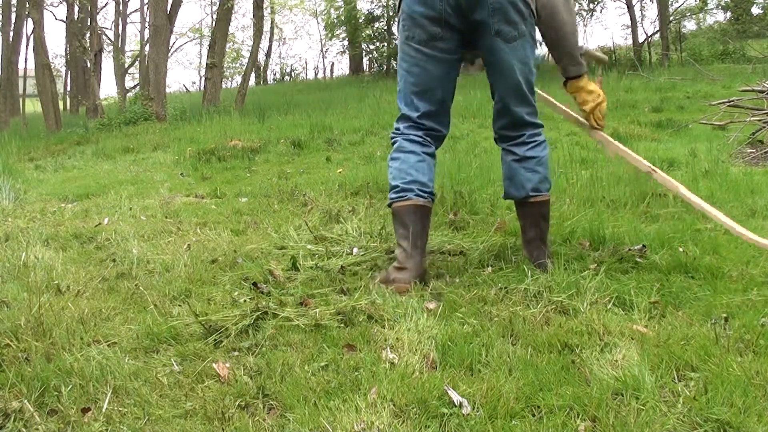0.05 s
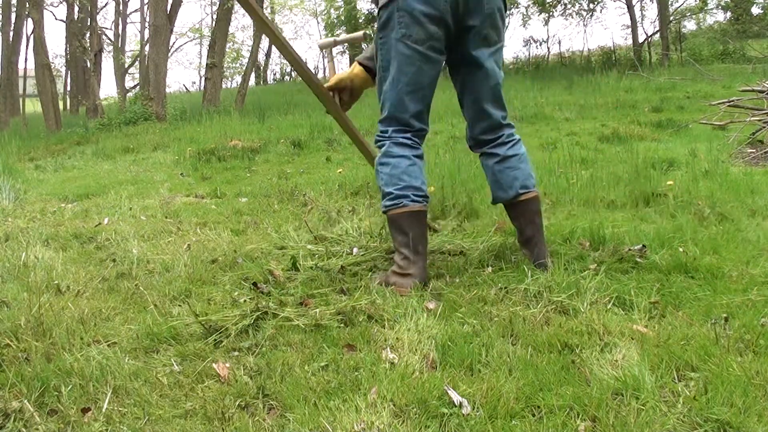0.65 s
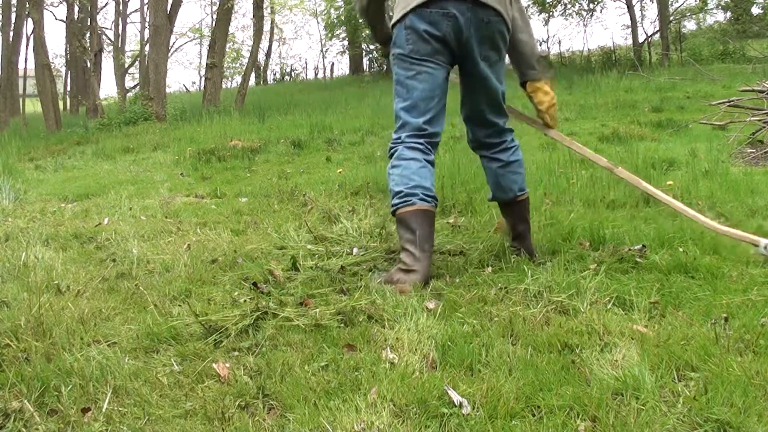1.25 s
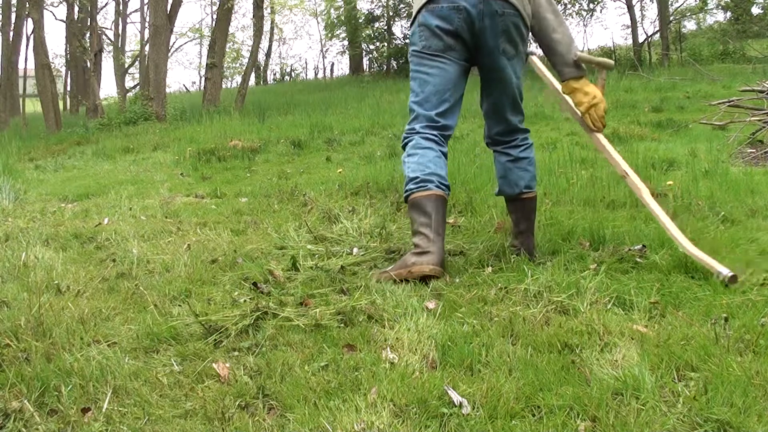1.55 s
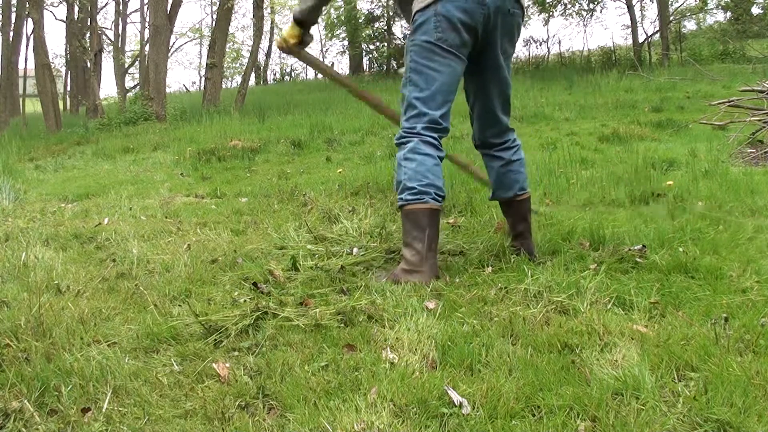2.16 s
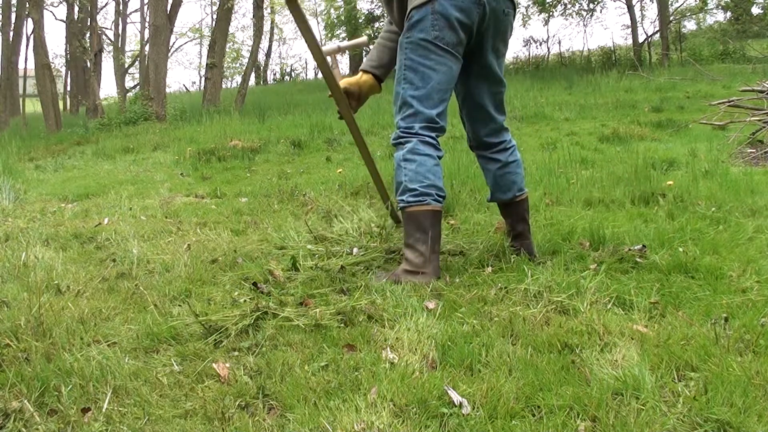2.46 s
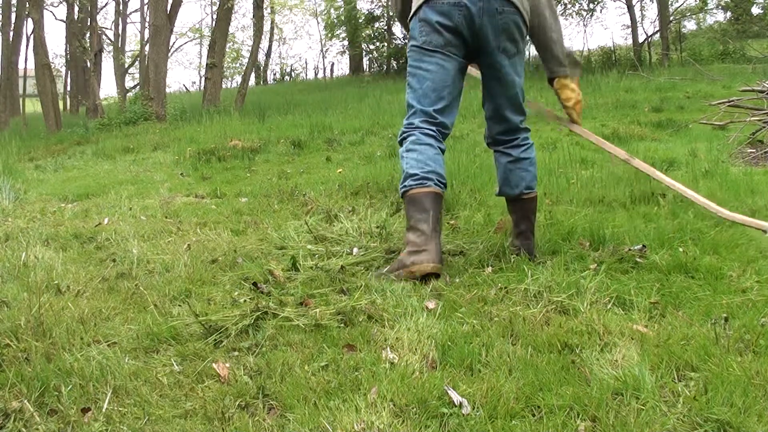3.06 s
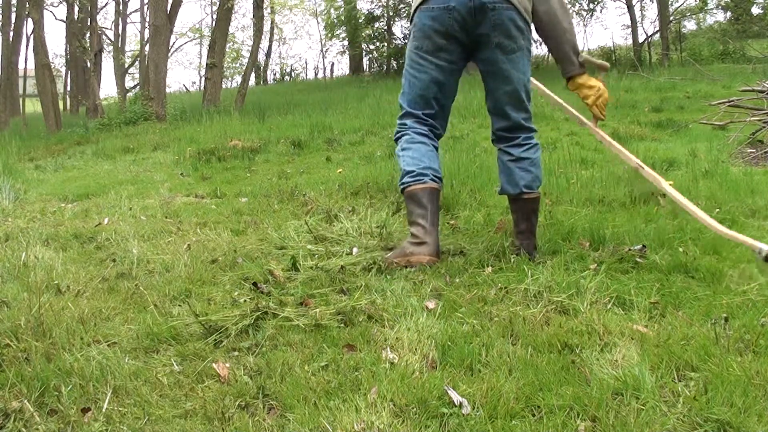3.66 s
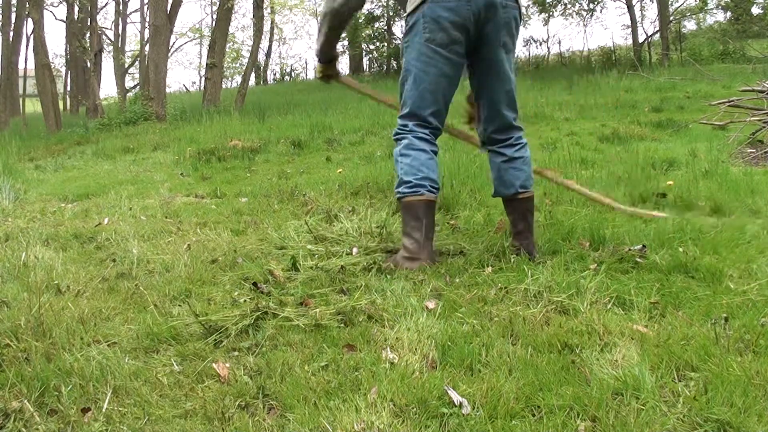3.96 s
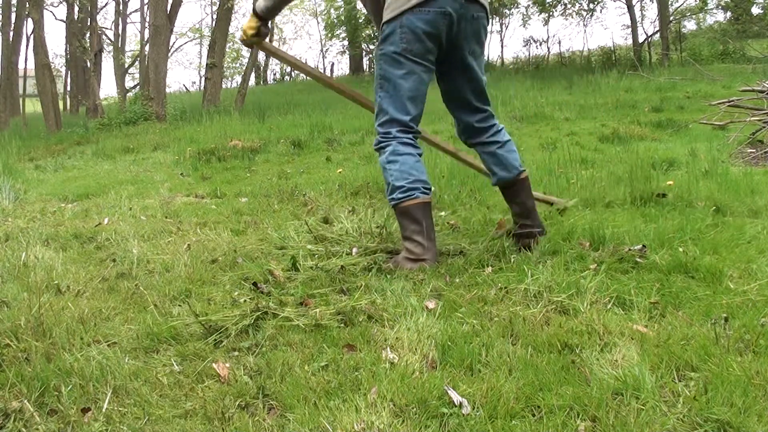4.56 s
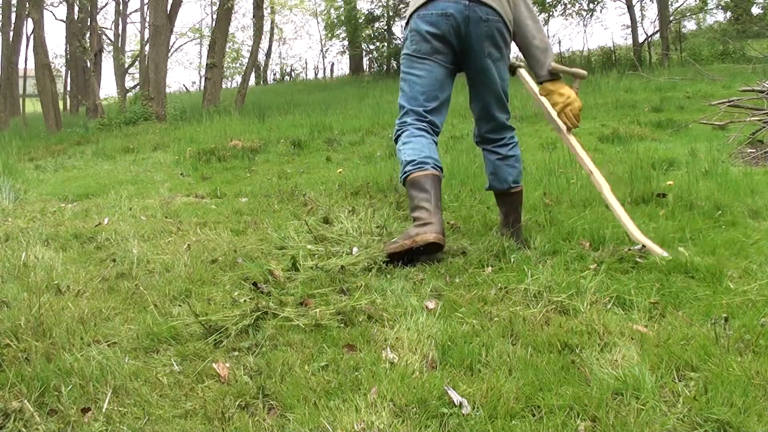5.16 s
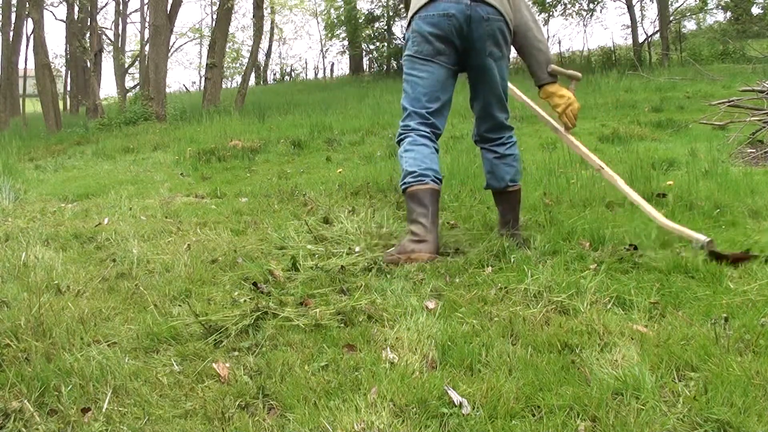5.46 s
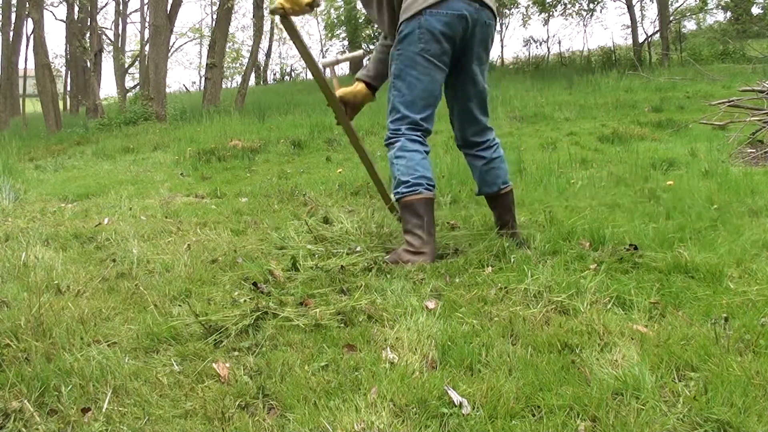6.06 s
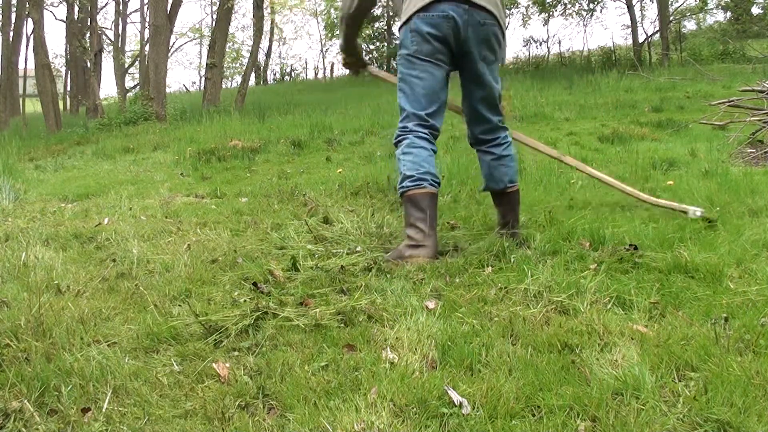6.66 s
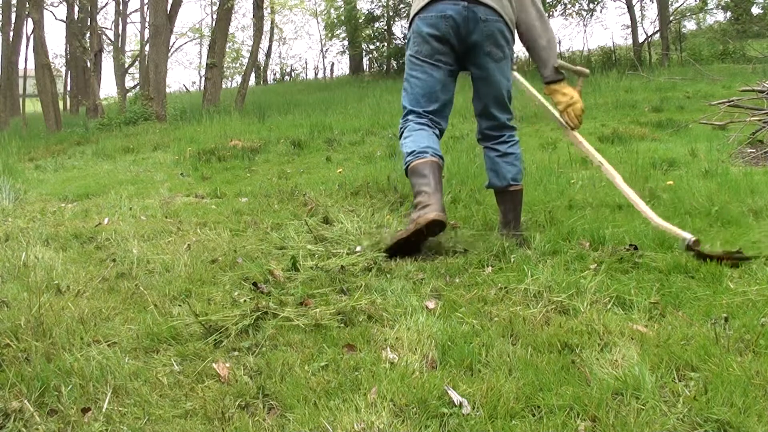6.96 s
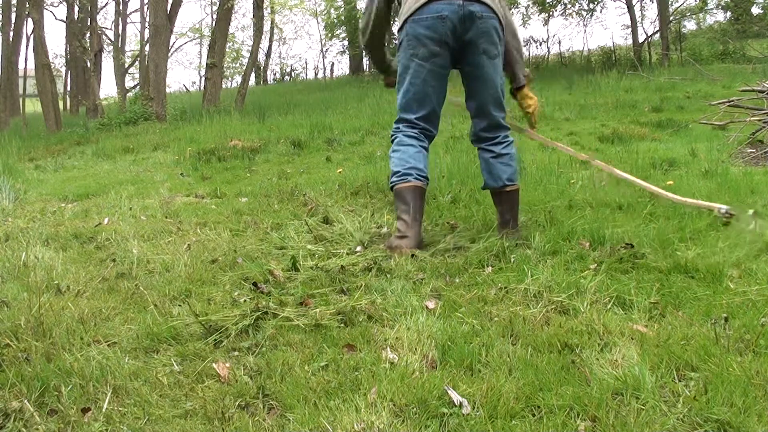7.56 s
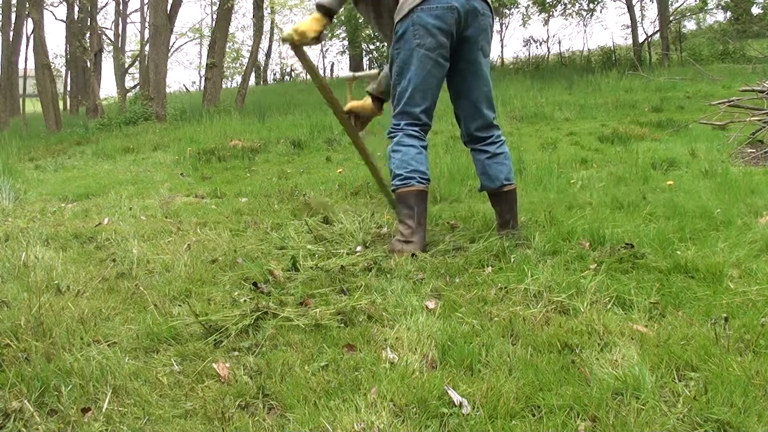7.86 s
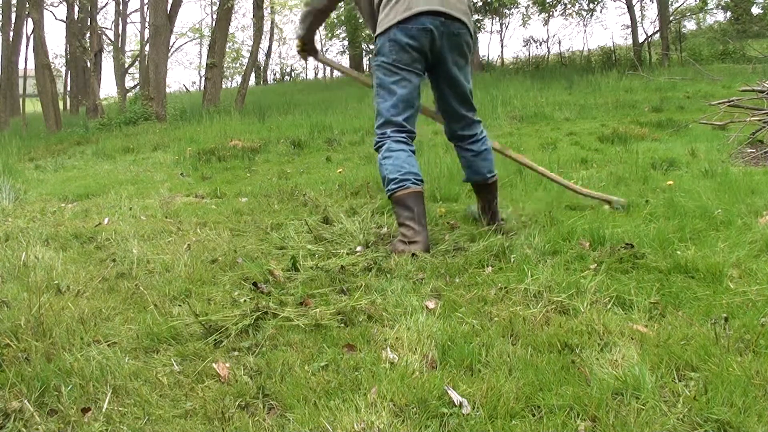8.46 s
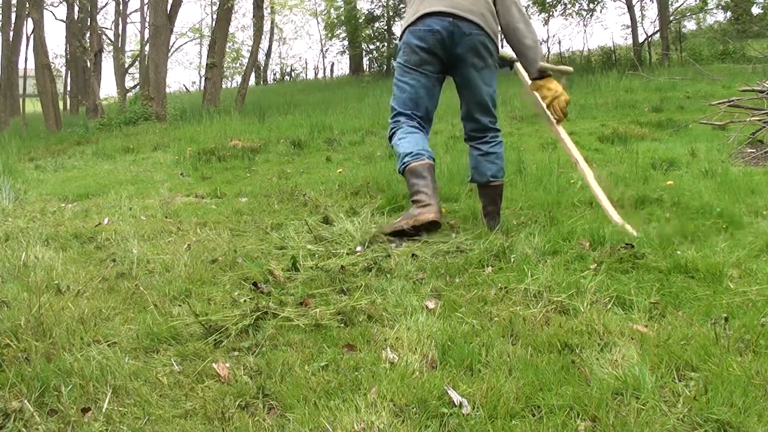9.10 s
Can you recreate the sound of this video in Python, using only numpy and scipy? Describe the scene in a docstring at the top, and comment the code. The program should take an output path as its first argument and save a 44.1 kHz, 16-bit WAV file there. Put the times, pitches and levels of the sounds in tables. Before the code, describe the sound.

Close to the microphone, a scythe mows grass in five strokes about two seconds apart. Each starts as a crisp, tearing hiss and sinks into a hollow whoosh, with thick stalks snapping. Between strokes the blade brushes back over stubble, boots scuff, and two dull wooden knocks sound. Farther off to the left, birds whistle and warble, then one trills, softly echoed by trees over a distant rumble.

```python
"""A grassy slope at the edge of a wood, the microphone close to a scythe mowing five strokes.
The blade swings in from the right, snips and tears through the stalks, heaves them into the swath
and slides back over the stubble; thick stalks snap, handle and boots knock. Farther off to the left,
birds trill, whistle and buzz, and the trees echo them. A distant rumble and faint hiss lie under it all."""
import sys
import numpy as np
from scipy import signal
from scipy.fft import rfft, irfft, next_fast_len
from scipy.io import wavfile
from scipy.ndimage import uniform_filter1d, map_coordinates

SR = 44100
rng = np.random.default_rng(int(sys.argv[2]) if len(sys.argv) > 2 else 0)


def dump(signal):
    """Clip the signal to [-1, 1] and save it as 16-bit WAV at the path in sys.argv[1]."""
    limited = np.clip(np.atleast_2d(signal).T, -1, 1)
    pcm = np.round(limited * 32767).astype(np.int16)
    wavfile.write(sys.argv[1], SR, pcm)


N = 411453

# Spectra of the cut, close up: (frequency [Hz], level [dB])
SNIP_SPECTRUM = [(1500, -13), (4000, -23), (5300, -4), (6200, 2), (7200, 0), (8200, -2.5), (10500, -6),
                 (12500, -9), (14000, -19), (16000, -20)]
TEAR_SPECTRUM = [(300, -37), (900, -7.5), (1450, -8), (1800, -3), (2300, -2.5), (3100, -0.5), (3700, 1.5),
                 (4800, 1), (6500, -3), (12000, -93)]
SWATH_SPECTRUM = [(80, -34), (200, -6.5), (380, -3.5), (580, -1), (780, -0.5), (1000, -1.5), (1180, -5.5),
                  (1320, -3), (1650, -3.5), (2200, -14.5), (2800, -5.5), (4500, -48)]
def mowing():
    """Close by, the edge snips and tears through the stand, then heaves the cut grass aside."""
    snip, tear, heave = stroke_gains()
    edge = stalks(SNIP_SPECTRUM, per_s=4000, scatter_db=.5, rub=.54, clump_db=.24,
                  patchy_db=1.57, side_db=-91)
    stems = stalks(TEAR_SPECTRUM, per_s=1500, scatter_db=.5, rub=1, clump_db=1.07,
                   patchy_db=2, side_db=-45)
    heap = stalks(SWATH_SPECTRUM, per_s=1200, scatter_db=1, rub=.96, clump_db=3.16,
                  patchy_db=1, side_db=-19)
    cut = amp(-1.05) * snip * edge + amp(-1.5) * (tear * stems + heave * heap)
    return swing(cut * amp(.9 * wobble(60)), width_octaves=.32)


# Strokes: (grass lands [s], blade enters [s before], bites [s before], leaves [s before],
# entry level [dB], bite level [dB], tearing relative to bite [dB], landing level [dB])
STROKES = [ (.499, .49, 0.23, .028, -35.5, -25, 0, -24.5),
           (2.292, .35, 0.095, 0.081, -29.5, -22.5, -1, -26),
           (4.196, 0.52, 0.24, .09, -30, -19.5, -3, -23.5),
           (6.007, 0.46, 0.18, 0.093, -29, -18.5, -2.5, -22.5),
           (7.895, 0.52, 0.18, 0.051, -30.5, -20.5, -1.5, -21.5)]
# Thick tufts met by the edge: (time [s], snipping [dB], tearing [dB])
TUFTS = [(.03, -32.5, -42.5), (.265, -26, -30), (.38, -28, -33), (1.965, -34.5, -32), (2.27, -20, -31),
         (3.81, -27, -25), (3.865, -24, -23.5), (4.065, -25, -22.5), (5.545, -27.5, -50), (5.825, -22, -21),
         (5.9, -29, -26), (7.69, -24, -21.5), (7.98, -25.5, -32), (9.25, -37.5, -42), (9.305, -33.5, -41)]
def stroke_gains():
    """Snip, tear and heave gains: the tip works in, the edge bites, grass piles up, lands and scatters."""
    times, snip_db, tear_db = np.transpose(TUFTS)
    snip = bumps(times, snip_db, width_s=.018)
    tear = bumps(times, tear_db, width_s=.018)
    heave = np.zeros(N)
    land_s, spray_s = .039, .045
    for s, enters, bites, leaves, entry_db, bite_db, torn_db, land_db in STROKES:
        entry = power(entry_db) * swell(s - enters, s - leaves, rise=97.5, fall=450, growth=-2)
        snipping_bite = power(bite_db) * swell(s - bites, s - leaves, rise=141, fall=450, growth=22)
        tearing_bite = power(bite_db + torn_db) * swell(s - bites, s - leaves, rise=141, fall=450)
        spray = power(-22) * swell(s - spray_s, s, rise=166, fall=137)
        gather = power(-8.5) * swell(s, s, rise=34.5, fall=137)
        landing = swell(s - land_s / 2, s + land_s / 2, rise=166, fall=236)
        snip += entry + snipping_bite + spray
        tear += power(-1.5) * entry + tearing_bite + power(-4.5) * spray
        heave += power(land_db) * (gather + landing)
    return np.sqrt([snip, tear, heave])


# The arc past the microphone: (time from landing [s], swish centre [Hz], lift [dB], left minus right [dB])
SWING_ARC = [(-.625, 6800, 0, -2.6), (-.325, 6200, 2.5, -2.8), (-.225, 4000, 5.5, -2.6),
             (-.175, 3500, 4, -2.2), (-.095, 2600, 4.5, -.6), (-.04, 1450, 4, 0), (.005, 720, 3.5, 0),
             (.075, 560, 2, 0), (.275, 500, 0, -.3)]
# Scaling of that left-right difference: (frequency [Hz], factor)
PAN_FACTORS = [(500, 1.1), (2000, 0.49), (4500, 1.3), (8000, 1.1), (12000, 0.033)]
def swing(x, width_octaves):
    """As the blade arcs in from the right, its swish sinks from a hiss to a hollow whoosh."""
    hz, t, spectra = signal.stft(x, SR, nperseg=512, noverlap=384)
    since = t[:, None] - np.array(STROKES)[:, 0]
    from_landing = since[np.arange(len(t)), np.abs(since).argmin(axis=1)]
    times, *columns = np.transpose(SWING_ARC)
    centre_hz, lift_db, pan_db = [np.interp(from_landing, times, column) for column in columns]
    band = np.exp(-.5 * (np.log2((hz[:, None] + 1) / centre_hz) / width_octaves) ** 2)
    lean_db = along(PAN_FACTORS, hz)[:, None] * pan_db
    spectra = spectra * amp(lift_db * (band - .3237)) * amp([lean_db / 2, -lean_db / 2])
    return signal.istft(spectra, SR, nperseg=512, noverlap=384)[1][:, :N]


# Thick stalks on the edge: (time [s], level [dB], pitch [Hz], 60 dB decay [s])
SNAPS = [(0.4524, -4, 6500, .004), (.506, -10, 7000, .005), (1.3118, -28, 3970, 0.023),
         (2.263, -1, 8000, 0.0072), (4.1052, -9, 6000, 0.0029), (5.8573, -5.5, 6000, 0.025),
         (5.9174, 2, 7560, .0078), (6.0584, -10, 6540, .008), (7.3792, -9.5, 6200, 0.016),
         (7.478, -5.5, 5660, 0.012), (7.8618, -4, 7000, .003), (7.954, 0.5, 8650, .002),
         (8.4413, -14, 4650, 0.018)]
# Moist stalks dull the very top of a snap: (frequency [Hz], gain [dB])
SNAP_COLOUR = [(300, 6), (1000, 3.5), (9000, -1.5), (12000, 3), (14000, -11), (16000, -14)]
def snaps():
    """A thick stalk breaks with a crack: the shorter it is, the broader its band."""
    track, t = np.zeros(N), np.arange(SR // 25) / SR
    for s, db, hz, t60 in SNAPS:
        burst = rng.standard_normal(len(t)) * amp(-60 * t / t60) * (1 - np.exp(-t / .0001))
        resonance = signal.iirpeak(hz, Q=1 + t60 / .008, fs=SR)
        crack = signal.lfilter(*resonance, burst)
        add(track, s, amp(db) * crack / np.abs(crack).max())
    return filtered(track, lambda hz: amp(along(SNAP_COLOUR, hz)))


# The blade sliding back: (start [s], length [s], mid-swing level [dB])
BACKSWINGS = [(0.824, 0.71, -40.5), (2.53, 0.92, -37.5), (4.517, 1, -39), (6.306, 0.87, -38),
              (8.214, 0.79, -36.5)]
# Boots and blade scuffing the ground: (time [s], level [dB])
SCUFFS = [(1.375, -42.5), (3.15, -38), (4.56, -36), (4.81, -38.5), (5.02, -43), (6.63, -37.5),
          (6.95, -42.5), (7.13, -40), (8.55, -39), (8.73, -36)]
# Brushed stubble: (frequency [Hz], level [dB])
STUBBLE_SPECTRUM = [(200, -3), (500, -9.5), (1000, -10), (2000, -5), (3500, -3), (4800, -3.5), (6200, 1.5),
                    (7300, 0), (8500, -3.5), (11000, -6.5), (14000, -16.5), (16000, -34)]
def backswing():
    """The blade's back eases onto the stubble, presses most at mid-swing and lifts; boots scuff along."""
    t = np.arange(N) / SR
    contact = bumps(*np.transpose(SCUFFS), width_s=.03)
    for s, length, db in BACKSWINGS:
        easing_db = 5.5 * np.minimum((2 * (t - s) / length - 1) ** 2, 1)
        contact += power(db - easing_db) * swell(s, s + length, rise=45, fall=45)
    gain = np.sqrt(contact) * amp(1.03 + 1.1 * wobble(22))
    return gain * stalks(STUBBLE_SPECTRUM, per_s=1500, scatter_db=0, rub=1, clump_db=.7,
                         patchy_db=1.5, side_db=-86)


# Dull knocks of handle and boots: (time [s], level [dB], change per contact [dB])
KNOCKS = [(4.56, -22.5, 1.5), (5.364, -23.5, -1)]
# The wooden handle: (frequency [Hz], bandwidth [Hz], level [dB])
HANDLE_MODES = [(830, 130, 5), (1070, 75, 6), (1300, 120, 6), (1990, 62, 2), (2330, 100, 4)]
def knocks(gap_s=.0105, contact_t60=.036):
    """Each knock is a quick rattle of three contacts that ring a few damped wooden modes."""
    track, t = np.zeros(N), np.arange(SR // 15) / SR
    ring = sum(amp(db) * np.exp(-np.pi * width * t) * np.sin(2 * np.pi * hz * t)
               for hz, width, db in HANDLE_MODES)
    for s, db, step_db in KNOCKS:
        for k in range(3):
            contact = rng.standard_normal(len(t)) * amp(-60 * t / contact_t60)
            knock = signal.fftconvolve(ring, contact)
            add(track, s + k * gap_s, amp(db + k * step_db) * knock / np.abs(knock).max())
    return track


# One slur of the trilling bird: (time from its accent [s], pitch [Hz], level [dB])
SLUR = [(-.024, 5116, -19), (-.014, 4114, -9.5), (-.003, 3625, -13), (.003, 3404, 1), (.01, 2994, -4),
        (.023, 2725, -7), (.029, 2130, -6.5), (.033, 1806, -21.5), (.056, 1310, -20)]
def trill(start_s=6.037, slurs=18, loudest_slur=7.2, shortest_gap_s=.149, first_pause_s=.025):
    """A falling slur repeats, fastest and loudest near mid-song; its path through trees makes it flicker."""
    track = np.zeros(N)
    times, hz, levels = np.transpose(SLUR)
    t = np.arange(times[0], times[-1], 1 / SR)
    for k in range(slurs):
        db = -21 - .06 * (k - loudest_slur) ** 2 + np.interp(t, times, levels)
        pitch = np.interp(t, times, hz) * (1 + .00896 * rng.standard_normal())
        add(track, start_s + times[0], amp(db) * np.sin(2 * np.pi * np.cumsum(pitch) / SR))
        slowing_s = .000124 * (k - (slurs - 1) / 2) ** 2
        start_s += shortest_gap_s + slowing_s + first_pause_s * (k == 0)
    return track * amp(1.8 * wobble(250))


# A warbled phrase: (offset [s], length [s], start [Hz], middle [Hz], end [Hz], level [dB])
PHRASE_NOTES = [(-.175, .06, 1550, 1660, 1600, -13), (-.112, .062, 1700, 2100, 2320, -5.5),
                (-.035, .035, 2400, 2650, 3000, -15), (-.005, .07, 3030, 3115, 3070, -1),
                (.12, .03, 3350, 3550, 3650, -14), (.155, .04, 2650, 2370, 2320, -9)]
# Each time it is sung: (time [s], level [dB], pitch ratio)
PHRASE_REPEATS = [(2.41, -35.5, 1.025), (2.81, -29.5, .998), (3.205, -27, .992), (3.6, -29.5, 1.0)]
# Loose notes: (time [s], length [s], start [Hz], middle [Hz], end [Hz], level [dB])
WHISTLES = [(2.835, .05, 1180, 1330, 1540, -42), (4.6, .045, 1800, 1720, 1680, -42),
            (4.635, .055, 2600, 2350, 1830, -38), (4.79, .18, 1750, 1600, 1510, -42.5),
            (5.212, .045, 2440, 2260, 1970, -31.5), (5.27, .05, 1830, 1740, 1700, -37),
            (5.458, .04, 1830, 1740, 1690, -35), (9.28, .06, 2650, 2400, 1900, -33)]
def songs():
    """Among the trees one bird sings a rolling phrase four times and another whistles; both flicker."""
    track = np.zeros(N)
    for s, db, ratio in PHRASE_REPEATS:
        for offset, length, *pitches, note_db in PHRASE_NOTES:
            add(track, s + offset, amp(db + note_db) * whistle(length, ratio * np.array(pitches)))
    for s, length, *pitches, db in WHISTLES:
        add(track, s, amp(db) * whistle(length, pitches))
    return track * amp(4.2 * wobble(90))


# Calls from deep in the wood: (time [s], length [s], start [Hz], middle [Hz], end [Hz], level [dB])
FAR_CALLS = [(0.082, 0.22, 2336, 2515, 2570, -42), (0.793, 0.17, 2360, 2520, 2670, -43.5),
             (1.705, 0.18, 2280, 2500, 2560, -42), (2.809, 0.154, 1080, 1110, 1114, -43)]
# Their partials: (pitch ratio, level [dB])
CALL_PARTIALS = [(1, 1.5), (1.16, -2.5), (1.29, -5.5)]
def far_calls():
    """Distant, raspy rising notes: a few close partials, each with its own fast flutter."""
    track = np.zeros(N)
    for ratio, partial_db in CALL_PARTIALS:
        partial = np.zeros(N)
        for s, length, *pitches, db in FAR_CALLS:
            add(partial, s, amp(db + partial_db) * whistle(length, ratio * np.array(pitches)))
        track += partial * (.69 + .81 * wobble(300))
    return track


# What the trees return of the trill: (frequency [Hz], gain [dB])
TRILL_ECHO_COLOUR = [(1500, -5), (2450, 0), (2780, -1), (2920, 4.5), (3100, -6.5), (4000, 4), (5000, -11)]
# Reverberation of the wood: (frequency [Hz], 60 dB decay [s])
WOOD_DECAY = [(300, .5), (1500, .75), (3000, .9), (6000, .4), (12000, .2)]
def wood_echo(slurs, notes, calls):
    """The trees scatter the birdsong into a soft, diffuse stereo tail."""
    far_slurs = filtered(slurs, lambda hz: amp(along(TRILL_ECHO_COLOUR, hz)))
    birdsong = amp(-11) * far_slurs + amp(-8.5) * notes + amp(-6) * calls
    echo, hop = np.zeros((2, N)), SR // 4
    for start in range(0, N - 2 * hop, hop):
        hz, t, noise = signal.stft(rng.standard_normal((2, SR)), SR, nperseg=256)
        envelope = amp(-60 * t / along(WOOD_DECAY, hz)[:, None]) * (1 - np.exp(-t / .01))
        mid, side = signal.istft(noise * envelope, SR, nperseg=256)[1]
        tails = spread(mid, side, side_db=-13) / np.linalg.norm(mid)
        piece = birdsong[start:start + 2 * hop] * np.sqrt(np.hanning(2 * hop))
        for channel, tail in zip(echo, tails):
            add(channel, start / SR, signal.fftconvolve(piece, tail))
    return echo


# Ambience of the slope: (frequency [Hz], level [dB])
RUMBLE_SPECTRUM = [(20, -38), (30, -35), (40, -24), (58, -6), (85, -2), (125, 1), (170, -3.5), (240, -8),
                   (340, -11), (480, -21.5), (900, -22), (2000, -28.5)]
AIR_SPECTRUM = [(30, -6), (200, 7.5), (900, 4), (2000, 3), (3000, 3), (4500, -22.5), (6500, -19),
                (9000, -50), (13000, -72), (16000, -5.5)]
# The rumble's rise and fall: (time [s], level [dB])
RUMBLE_LEVELS = [(0.0, -35.5), (0.07, -42.5), (0.36, -41), (0.72, -47), (3.9, -36.5), (4.65, -42.5),
                 (5.53, -38), (9.33, -39.5)]
def outdoors():
    """A distant rumble and a faint, even hiss of air and leaves, widest in the midrange."""
    mid, side = coloured(rng.standard_normal((2, N)), RUMBLE_SPECTRUM)
    rumble = spread(mid, side, side_db=-29.5) * amp([[-.3], [.3]])
    rumble_db = np.interp(np.arange(N) / SR, *np.transpose(RUMBLE_LEVELS))
    mid, side = coloured(rng.standard_normal((2, N)), AIR_SPECTRUM)
    side = filtered(side, lambda hz: hz / (hz + 150) / (1 + (hz / 4500) ** 2))
    air = spread(mid, side, side_db=3)
    return amp(rumble_db + .6 + .82 * wobble(6.3)) * rumble + amp(-51) * air


def stalks(spectrum, per_s, scatter_db, rub, clump_db, patchy_db, side_db):
    """Many stalks crack at random, in tufts, over the smooth rub of leaves."""
    sizes = amp(scatter_db * np.minimum(rng.standard_normal((2, N)), 2))
    cracks = (rng.random((2, N)) < per_s / SR) * rng.choice([-1, 1], (2, N)) * sizes
    tufts = amp(clump_db * (wobble(45) + wobble(260)))
    rustle = (unit(cracks) + rub * rng.standard_normal((2, N))) * tufts
    mid, side = coloured(patchy(rustle, patchy_db), spectrum)
    return spread(mid, side, side_db)


def patchy(x, depth_db):
    """Every tuft has its own colour: random gains about 600 Hz wide and 50 ms long."""
    spectra = signal.stft(x, nperseg=512)[2]
    patches = uniform_filter1d(rng.standard_normal(spectra.shape[1:]), size=7, axis=0)
    patches = uniform_filter1d(patches, size=9, axis=1)
    return signal.istft(spectra * amp(depth_db * unit(patches)), nperseg=512)[1][:, :N]


def whistle(length_s, pitches_hz):
    """A pure note bending through three pitches, with soft ends."""
    progress = np.linspace(0, 1, int(length_s * SR))
    hz = np.polyval(np.polyfit([0, .5, 1], pitches_hz, 2), progress)
    return np.sin(2 * np.pi * np.cumsum(hz) / SR) * np.abs(np.sin(np.pi * progress)) ** .18


def swell(start, end, rise, fall, growth=0):
    """Power over time: a rise to start, a sloping hold (1 at its middle), a fall after end; all in dB/s."""
    t = np.arange(N) / SR
    held = np.clip(t, start, end)
    hold_db = growth * (held - (start + end) / 2)
    db = hold_db - rise * np.maximum(held - t, 0) - fall * np.maximum(t - held, 0)
    return power(np.maximum(db, -120))


def bumps(times, levels_db, width_s):
    """Power over time of brief, bell-shaped swells."""
    total, t = np.zeros(N), np.arange(N) / SR
    for s, db in zip(times, levels_db):
        near = np.abs(t - s) < 10 * width_s
        total[near] += power(db) * np.exp(-.5 * ((t[near] - s) / width_s) ** 2)
    return total


def amp(db):
    """Decibels to gain."""
    return 10 ** (np.asarray(db) / 20)


def power(db):
    """Decibels to power."""
    return amp(db) ** 2


def unit(x):
    """Scale to rms 1."""
    return x / np.sqrt(np.mean(x ** 2) + 1e-20)


def along(points, hz):
    """(Hz, value) points read on a log axis."""
    frequencies, values = np.transpose(points)
    return np.interp(np.log(hz + 1), np.log(frequencies + 1), values)


def wobble(rate):
    """A smooth random curve, rate knots a second."""
    knots = rng.standard_normal(int(N * rate / SR) + 4)
    return map_coordinates(knots, [np.arange(N) * rate / SR])


def filtered(x, response):
    """x through a frequency response."""
    size = next_fast_len(N + SR // 2)
    return irfft(rfft(x, size) * response(np.fft.rfftfreq(size, 1 / SR)), size)[..., :N]


def coloured(x, spectrum):
    """x shaped by a spectrum, at rms 1."""
    return unit(filtered(x, lambda hz: amp(along(spectrum, hz))))


def add(track, s, sound):
    """Mix a sound into a track at time s."""
    start = max(round(s * SR), 0)
    part = track[start:start + len(sound)]
    part += sound[:len(part)]


def spread(mid, side, side_db):
    """Left and right from a centre and a side signal."""
    return mid + amp(side_db) * np.array([side, -side])


def scene():
    """The scythe close to the microphone, the birds off to the left among the trees."""
    scythe = mowing() + snaps() + (backswing() + knocks()) * amp([[-.4], [.4]])
    slurs, notes, calls = trill(), songs(), far_calls()
    birds = (amp(-2) * slurs + amp(-3.5) * notes + amp(-2) * calls) * amp([[1.3], [-1.3]])
    return scythe + birds + wood_echo(slurs, notes, calls) + outdoors()


def record(dry):
    """A soft limiter rounds off the sharpest snaps, and nothing above 15.9 kHz is kept."""
    ceiling, top_hz = .85, 15900
    rounded = dry / (1 + np.abs(dry / ceiling) ** 6) ** (1 / 6)
    return filtered(rounded, lambda hz: hz < top_hz)


dry = scene()
out = record(dry)
dump(out)
```